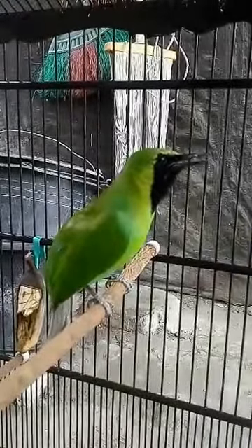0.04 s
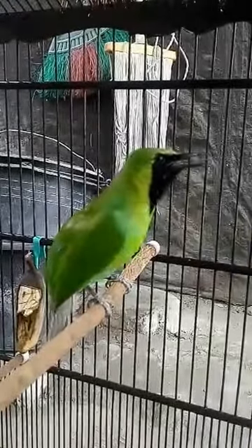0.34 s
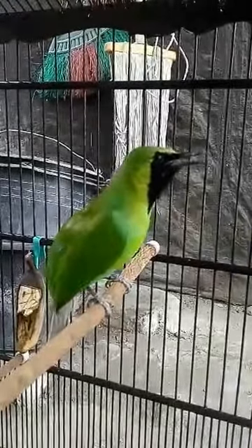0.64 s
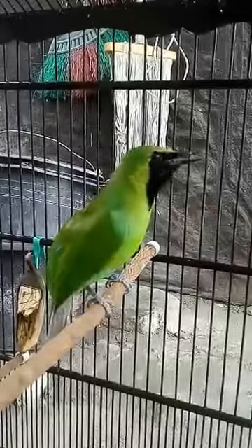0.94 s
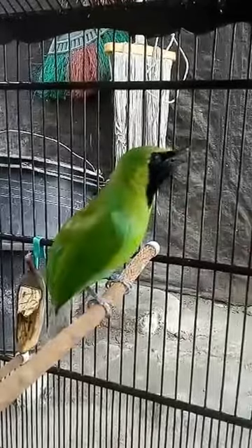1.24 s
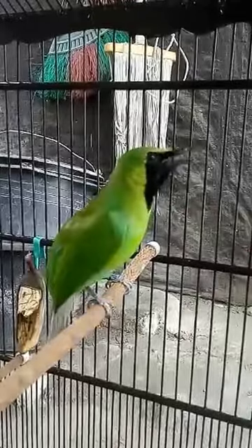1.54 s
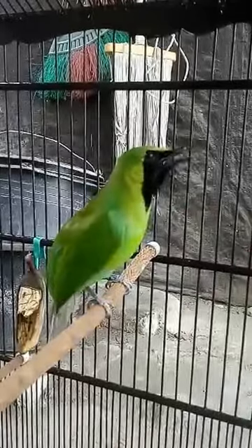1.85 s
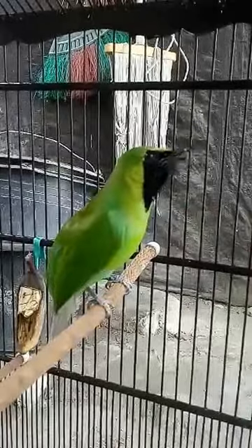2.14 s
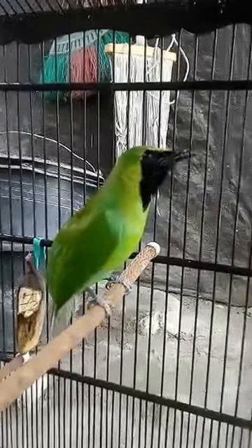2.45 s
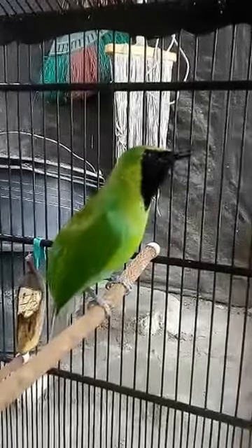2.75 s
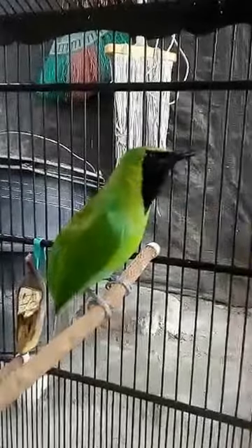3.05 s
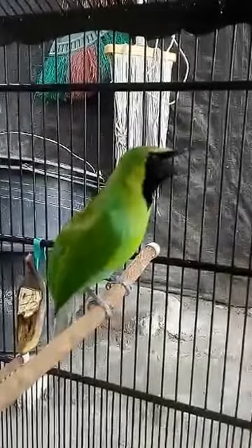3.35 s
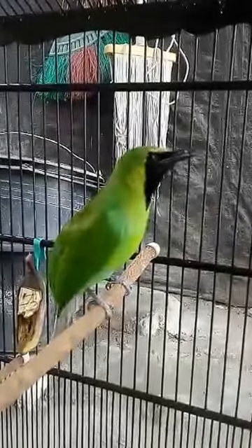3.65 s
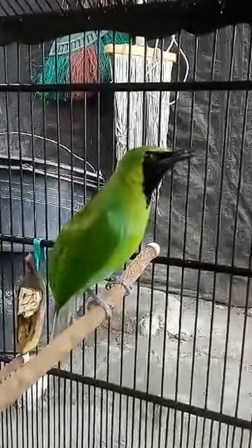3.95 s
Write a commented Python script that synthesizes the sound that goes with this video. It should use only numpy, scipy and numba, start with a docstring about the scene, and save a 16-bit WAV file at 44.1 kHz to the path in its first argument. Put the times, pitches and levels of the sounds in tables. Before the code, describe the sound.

Close to the microphone, a bird in a cage alternates short trills and dipping notes, repeats rough rising chirps, then ends with sharp sweeps. Two faint taps touch the cage, and soft traffic rumble carries into the small space.

```python
"""A caged leafbird sings close up in a small hard-walled space: falling whistles, buzzy trills, dipping
calls, a run of raspy rising chirps and two sweeps sung with both sides of its syrinx. Each voice is a
vibrating membrane, its overtones and breath shaped by the beak. Two light taps touch the cage.
Behind it, a distant engine rumbles in a bed of street noise and soft hiss.
A limiter ducks the whole mix at each loud note."""
import sys
import numpy as np
from scipy import signal
from scipy.fft import rfft, irfft, next_fast_len
from scipy.io import wavfile
from scipy.ndimage import uniform_filter1d, minimum_filter1d
from numba import njit

SR = 44100
rng = np.random.default_rng(int(sys.argv[2]) if len(sys.argv) > 2 else 0)


def unload_audio(sound):
    """Save the sound as a 16-bit wav file, at the path given as the first command line argument."""
    columns = np.transpose(np.atleast_2d(sound))
    # keep every value between -1 and 1, then stretch to whole-number steps
    steps = np.round(np.clip(columns, -1, 1) * 32767)
    wavfile.write(sys.argv[1], SR, steps.astype(np.int16))


N = 176400
T = np.arange(N) / SR

# Gliding whistles, one curve a note. Each point: time in seconds, pitch in Hz, level in dB.
WHISTLES = [
    [(-.005, 3326, -17), (.023, 3360, 1), (.038, 3127, -5), (.046, 2920, -11.5), (.053, 2410, 2),
     (.062, 1970, -13.5), (.072, 1690, -30)],
    [(2.594, 3300, -51), (2.614, 4264, -33), (2.634, 5450, -16), (2.644, 4674, -18), (2.652, 3685, 1.5),
     (2.668, 3560, 6), (2.682, 3380, -2), (2.701, 3500, 5), (2.715, 3276, 4), (2.723, 2804, -4),
     (2.73, 2400, 0), (2.739, 2000, -16), (2.751, 1670, -24)],
    [(3.451, 3020, -21), (3.457, 3770, -8), (3.466, 4620, -15), (3.481, 4980, -4), (3.497, 5770, -8.5),
     (3.507, 5060, -8), (3.516, 4120, 3.5), (3.528, 3816, 1), (3.545, 4085, -0.5), (3.556, 4177, -6)],
    [(3.536, 3300, -15), (3.546, 3750, -13), (3.562, 3636, -5.5), (3.573, 3514, 6.5), (3.584, 3200, 3),
     (3.592, 2990, -4), (3.604, 2776, -7.5), (3.61, 2380, 3), (3.617, 1990, -17.5), (3.627, 1620, -29.5)],
]
# The hoarse lower voice under each upward sweep. Each point: time in seconds, pitch in Hz, level in dB.
UNDERTONES = [
    [(2.588, 1798, -32.5), (2.603, 2113, -26.5), (2.618, 2390, -0.5), (2.629, 2940, -15), (2.648, 3055, -7)],
    [(3.451, 2205, -32), (3.457, 2290, -12), (3.478, 2527, -5), (3.487, 2820, -18.5), (3.508, 2927, -7.5)],
]
# Dipping calls, one curve a note. Each point: time in seconds, pitch in Hz, tone and overtones in dB.
DIPS = [
    [(.437, 3274, -36, -55), (.443, 2755, -22, -47), (.448, 2450, 0, -26), (.458, 2103, -9, -28.5),
     (.48, 1900, -18, -29), (.498, 2012, -13, -31), (.507, 2543, -1.5, -17.5), (.516, 2790, -7, -31)],
    [(.884, 3240, -31, -55), (.891, 2816, -30.5, -47), (.898, 2390, 0, -32), (.909, 2147, -12, -27),
     (.928, 1938, -17, -26.5), (.947, 1955, -11, -22.5), (.954, 2430, -5.5, -19.5),
     (.965, 3170, -10.5, -33)],
    [(3.155, 2600, -22, -48), (3.158, 2270, -20, -45), (3.163, 1804, -14.5, -30), (3.173, 1683, -8.5, -38),
     (3.183, 1810, -13, -34), (3.193, 1910, -63, -50), (3.207, 2200, -17, -47), (3.216, 2600, -4, -48),
     (3.222, 2270, -1.5, -34), (3.229, 2420, -6, -26)],
    [(3.304, 2627, -18, -47), (3.307, 2425, -7.5, -34), (3.313, 1952, -8.5, -28), (3.33, 1753, -10, -27),
     (3.339, 1846, -41, -52), (3.346, 2033, -26, -31), (3.353, 2423, 2, -29), (3.362, 2574, -1, -23),
     (3.371, 2520, 6, -19)],
]
# Buzzy trills. Each row: start and length in seconds, a time in seconds that the vibrato crests line
# up with, vibrato rate in Hz, centre pitch in Hz, crest level in dB.
TRILLS = [(0.159, 0.13, 0.16, 76.5, 2091, -5), (0.619, 0.13, 0.53, 74, 2167, -3)]
# Rising chirps. Each row: time of the upward snap in seconds, low, top and end pitch in Hz, hold in
# seconds, base tone and overtone levels in dB, rasp from 0 to 1, lead-in trim in dB, lead-in rasp.
CHIRPS = [ (1.155, 2053, 2694, 2760, .029, -7.5, -19, 1, 5, 0.32),
          (1.296, 2225, 2583, 2902, .028, -7, -17, 0.98, -1, 0.4),
          (1.456, 2180, 2824, 2870, 0.0266, -9, -18, 0.88, -3.5, 0.2),
          (1.606, 2362, 2860, 3357, .026, -8.5, -19.5, 0.8, 8, 0.3),
          (1.749, 2164, 2565, 2845, .025, -6.5, -20.5, 1, -0.5, 0.23),
          (1.901, 2194, 2640, 2757, 0.0232, -9, -18.5, 0.73, 0, 0.23),
          (2.037, 2238, 2606, 2730, 0.019, -7, -17.5, 0.92, 1.5, 0.21),
          (2.198, 2123, 2493, 2860, .024, -4.5, -20.5, 0.53, 0, 0.17),
          (2.372, 2040, 2589, 2630, 0.054, -6, -29, 0.11, 1, 0.2)]
# Throat and beak resonances that colour the overtones. Each row: frequency in Hz, gain in dB.
BEAK_EQ = [(3000, 7.5), (4200, 3), (5200, -4), (6100, 1), (7100, -3), (8200, -0.5), (8900, -1.5),
           (9500, -10.5), (11000, 0), (13000, -7.5), (15500, -5)]
# Hiss of air in the beak. Each row: frequency in Hz, gain in dB.
AIR_EQ = [(1200, -49), (2500, 7), (5000, 5.5), (8500, -8.5), (9500, -22.5), (11200, -3.5), (15000, -5)]
# Light taps on the cage. Each row: start in seconds, tick level in dB, ring level in dB.
CAGE_TAPS = [(2.526, -31, -54), (3.667, -42, -30.5)]
# Early reflections off the near walls. Each row: delay in seconds, level in dB.
REFLECTIONS = [(.0047, -11), (0.0113, -15.5), (0.017, -19.5)]
# Tone of the reverb tail. Each row: frequency in Hz, gain in dB.
TAIL_EQ = [(1000, -11), (2000, -4.5), (2800, 1.5), (3600, -4.5), (6000, 4.5), (15000, 3)]
# Width where the two microphone ports disagree, near 2 kHz. Each row: frequency in Hz, side gain in dB.
MIC_SIDE_EQ = [(900, -19), (1700, -6), (1950, 6.5), (2150, 0.5), (2350, -23.5), (2550, -39.5), (3400, -32),
               (4100, -12), (5500, -42), (15000, -25)]
# The distant engine's pace. Each row: time in seconds, firings per second, level in dB.
ENGINE_RUN = [(0, 64.4, -31), (0.801, 57.1, -21.5), (1.198, 57.3, -18.5), (1.698, 56, -21),
              (2.299, 54.4, -24), (2.548, 55.8, -19.5), (2.898, 58, -21), (3.15, 57.8, -21.5),
              (3.448, 56, -23), (4, 43.6, -22.5)]
# The dull exhaust. Each row: frequency in Hz, gain in dB.
EXHAUST_EQ = [(30, -39), (60, -9), (90, -11.5), (122, 1.5), (145, -0.5), (172, 1), (260, -12.5),
              (460, -17.5), (800, -25.5), (2000, -57), (8000, -120)]
# Rumble and hiss of the street. Each row: frequency in Hz, gain in dB.
STREET_EQ = [(20, -14.5), (42, -7.5), (62, 0.5), (85, -2), (215, 1), (260, -5), (460, -6), (700, -13.5),
             (1300, -15.5), (2300, -23.5), (4000, -25), (6400, -27.5), (8500, -46), (12000, -58),
             (15500, -62)]
# Fader ride on the street. Each row: time in seconds, level in dB.
STREET_SWELL = [(0, -26), (1.2, -27), (2.4, -27.5), (2.8, -25), (3.15, -20), (3.45, -17.5), (3.75, -25.5),
                (4, -24)]
# Stereo width of the street. Each row: frequency in Hz, side over mid in dB.
STREET_SIDE_EQ = [(30, -22), (150, -50), (350, -14), (700, -5), (1400, 1.5), (2500, -3), (15000, 3)]

# Balance of harmonics 2 to 6, ahead of the beak's resonances.
WHISTLE_HARMONICS_DB = (-4, -7, -27, -36, -41)
REEDY_HARMONICS_DB = (-4, -9, -18.5, -25.5, -27)
CALL_HARMONICS_DB = (-8, -5.5, -21.5, -16.5, -19)


def syrinx(t, hz, db, overtone_db, harmonics_db, rasp, air_db=4.5, rasp_hz=520):
    """A vibrating membrane: a tone, plus overtones and air through the beak. Rasp shakes pitch and gain."""
    shaken_hz = hz * (1 + 0.062 * rasp * wander(t, 2 * rasp_hz))
    phase = 2 * np.pi * np.cumsum(shaken_hz) / SR
    harmonics = sum(undb(d) * np.sin(k * phase) * (k * hz < SR / 2) for k, d in enumerate(harmonics_db, 2))
    breath = undb(air_db + 9.5 * (rasp - 2)) * noise(AIR_EQ, size=len(t))  # rougher is breathier
    overtones = colour(harmonics + breath, BEAK_EQ)
    flutter = 1 + rasp * wander(t, rasp_hz)
    return np.sqrt(2) * flutter * (undb(db) * np.sin(phase) + undb(overtone_db) * overtones)


def glides(curves, overtone_db, harmonics_db, **voice):
    """Slurred notes from one side of the syrinx, the overtones riding with the level."""
    out = np.zeros(N)
    for curve in curves:
        times, hz, db = np.array(curve).T
        t = span(times[0], times[-1])
        level = np.interp(t, times, db)
        note = syrinx(t, np.interp(t, times, hz), level, level + overtone_db, harmonics_db, **voice)
        add(out, t, gate(t, times[0], times[-1]) * note)
    return out


def dips(rasp=0.19, snap_rasp=0.58, snap_s=0.0053):
    """Calls that drop to a soft low note and snap back up, with grit at the very end."""
    out = np.zeros(N)
    for curve in DIPS:
        times, *controls = np.array(curve).T
        t = span(times[0], times[-1])
        hz, db, overtone_db = (np.interp(t, times, c) for c in controls)
        grit = rasp + snap_rasp * np.exp(-np.abs(t - times[-1]) / snap_s)
        note = syrinx(t, hz, db, overtone_db, CALL_HARMONICS_DB, grit)
        add(out, t, gate(t, times[0], times[-1]) * note)
    return out


def trills(depth=0.093, sag=0.158, accent_db=5, fade_db=-20, attack_s=0.032, release_s=0.0243):
    """A buzz of fast vibrato, loudest on each crest; the pitch sags as the note ends."""
    out = np.zeros(N)
    for start, length, crest, rate, pitch, db in TRILLS:
        end = start + length
        t = span(start, end)
        rise = np.clip((t - start) / attack_s, 0, 1)
        fall = np.clip((end - t) / release_s, 0, 1)
        vibrato = np.cos(2 * np.pi * rate * (t - crest)) * rise * fall
        hz = pitch * (1 + depth * vibrato - sag * (1 - fall))
        level = db + accent_db * (vibrato - 1) + fade_db * (1 - rise + (1 - fall) / 2)
        note = syrinx(t, hz, level, level - 18.5, CALL_HARMONICS_DB, rasp=0.47)
        add(out, t, gate(t, start, end) * note)
    return out


def chirps(lead_s=0.028, snap_s=0.00578, release_s=0.0082):
    """A soft reedy lead-in snaps up to a rough top note, accented at both ends."""
    # Envelope points: three of lead-in, mid-snap, opening accent, waist, closing accent, release.
    tone_shape_db = np.array([-32.5, -19.5, -11, 4.5, 4.5, -14, 7, -24])
    overtone_shape_db = [-13, -7.5, -4, 0, 9, -3, -1.5, -24]
    out = np.zeros(N)
    for at, low, top, last, hold, db, overtone_db, rasp, lead_db, lead_rasp in CHIRPS:
        lead_times = [-lead_s, -lead_s * 2 / 3, 0]
        times = at + np.array([*lead_times, snap_s / 2, snap_s, hold * 0.57, hold * 0.9, hold + release_s])
        pitches = [low * 0.85, low * 0.94, low, (low + 2 * top) / 3, top, top, last, last]
        t = span(times[0], times[-1])
        level = db + np.interp(t, times, [*(tone_shape_db[:3] + lead_db), *tone_shape_db[3:]])
        overtone_level = overtone_db + np.interp(t, times, overtone_shape_db)
        grit = np.interp(t, times[4:6], [lead_rasp, rasp])
        note = syrinx(t, np.interp(t, times, pitches), level, overtone_level, REEDY_HARMONICS_DB, grit)
        add(out, t, gate(t, times[0], times[-1]) * note)
    return out


def cage_taps(tick_s=0.0015, wire_hz=1260, wire_t60_s=0.56):
    """Each tap is a bright tick and the faint ring of a cage wire."""
    out = np.zeros(N)
    for at, tick_db, ring_db in CAGE_TAPS:
        t = T[T >= at]
        age = t - at
        tick = undb(tick_db) * np.exp(-age / tick_s) * noise(AIR_EQ, size=len(t))
        ring = undb(ring_db) * decay(age, wire_t60_s) * np.sin(2 * np.pi * wire_hz * age)
        add(out, t, tick + ring)
    return out


def room(dry, wet_db=-14.5, split_hz=4500, low_t60_s=0.24, treble_t60_s=0.15, onset_s=0.0088):
    """Hard walls add early reflections and a short diffuse tail that loses its treble first."""
    near = dry + sum(undb(db) * np.interp(T - lag, T, dry, left=0) for lag, db in REFLECTIONS)
    t = T[:SR // 2]
    fade_in = np.clip(t / onset_s, 0, 1) ** 2
    tails = []
    for _ in range(2):  # mid, then side
        white = rng.standard_normal(len(t))
        low = signal.sosfiltfilt(signal.butter(2, split_hz, fs=SR, output="sos"), white)
        tail = low * decay(t, low_t60_s) + (white - low) * decay(t, treble_t60_s)
        impulse = colour(unit(tail * fade_in), TAIL_EQ) / np.sqrt(len(t))
        tails.append(signal.fftconvolve(dry, impulse)[:N])
    reverb = stereo(tails[0], undb(1.5) * tails[1])
    return stereo(near, colour(near, MIC_SIDE_EQ)) + undb(wet_db) * reverb


def engine(jitter=0.025, scatter_db=5, smear_s=0.019, hum_db=-5, side_db=-17):
    """Uneven firings through a dull exhaust, smeared by houses on the way, over a low hum."""
    times, rate, db = np.array(ENGINE_RUN).T
    cycles = np.cumsum(np.interp(T, times, rate) * (1 + jitter * wander(T, 30))) / SR
    firings = np.diff(np.floor(cycles), prepend=0) * undb(scatter_db * wander(T, 100))
    t = T[:SR // 4]
    smear = 0.029 * rng.standard_normal(len(t)) * np.exp(-t / smear_s)
    exhaust = unit(colour(firings + signal.fftconvolve(firings, smear)[:N], EXHAUST_EQ))
    hum = sum(np.sin(2 * np.pi * order * cycles) * (1 + 0.38 * wander(T, 9)) for order in (2, 3))
    drone = unit(exhaust + undb(hum_db) * hum)
    return stereo(drone, undb(side_db) * noise(EXHAUST_EQ)) * undb(np.interp(T, times, db))


def street():
    """A bed of traffic rumble and hiss that swells once."""
    times, db = np.array(STREET_SWELL).T
    bed = stereo(noise(STREET_EQ), colour(noise(STREET_EQ), STREET_SIDE_EQ))
    return bed * undb(np.interp(T, times, db))


def hiss(centre_s=3.26, width_s=0.35, db=-41):
    """A soft, bright hiss that fades up and away late in the song."""
    band = [(2000, -26), (4000, 1), (5200, 3.5), (6500, -16), (9000, -19), (15000, -32)]  # Hz, dB
    swell = np.exp(-((T - centre_s) / width_s) ** 2)
    return stereo(noise(band), undb(-8) * noise(band)) * undb(db) * swell


def undb(db):
    """Decibels to gain."""
    return 10 ** (np.asarray(db) / 20)


def unit(x):
    """Scale to rms 1."""
    return x / np.sqrt(np.mean(x ** 2))


def decay(t, t60_s):
    """An envelope that falls 60 dB in t60_s."""
    return np.exp(-np.log(1000) * t / t60_s)


def colour(x, eq):
    """Apply an EQ curve of (Hz, dB) points."""
    hz, db = np.array(eq, float).T
    size = next_fast_len(len(x) + 2048)
    f = np.maximum(np.fft.rfftfreq(size, 1 / SR), 1)
    gain = undb(np.interp(np.log(f), np.log(hz), db))
    return irfft(rfft(x, size) * gain, size)[:len(x)]


def noise(eq, size=N):
    """Coloured noise of rms 1."""
    return unit(colour(rng.standard_normal(size), eq))


def wander(t, rate_hz):
    """A modulator: random values joined by straight lines."""
    knots = rng.standard_normal(4096)
    return np.interp((t - t[0]) * rate_hz, np.arange(len(knots)), knots)


def span(start, end):
    """Sample times of one note, with handles for its fades."""
    return T[(T > start - .01) & (T < end + .01)]


def gate(t, start, end, fade_s=0.0034):
    """A soft gate that opens just before start and closes just after end."""
    return np.sin(np.pi / 2 * np.clip(np.minimum(t - start, end - t) / fade_s + 1, 0, 1)) ** 2


def add(out, t, sound):
    """Mix a sound in at its sample times."""
    out[np.rint(t * SR).astype(int)] += sound


def stereo(mid, side):
    """Left and right from mid and side."""
    return np.array([mid - side, mid + side])


@njit
def follow(x, fall):
    """Peak follower: instant attack, exponential release."""
    out, held = np.empty(len(x)), 0.
    for i in range(len(x)):
        held = max(x[i], held * fall)
        out[i] = held
    return out


def scene(pan_db=1.05):
    """Bird and cage up front in the room; the background leans slightly left."""
    bird = glides(WHISTLES, -21.5, WHISTLE_HARMONICS_DB, rasp=0.061, air_db=12)
    bird += glides(UNDERTONES, -7, REEDY_HARMONICS_DB, rasp=0.36)
    bird += dips() + trills() + chirps()
    foreground = room(bird + cage_taps())
    background = engine() + street() + hiss()
    return foreground + background * undb([[pan_db], [-pan_db]])


def record(dry, threshold_db=-4, ratio=4.28, release_s=0.056, top_hz=15600):
    """A limiter ducks the mix at loud notes; any overs clip, and a steep low-pass trims the top."""
    peak = follow(np.abs(dry).max(axis=0), np.exp(-1 / (release_s * SR)))
    gain = np.minimum(1, undb(threshold_db) / peak) ** (1 - 1 / ratio)
    gain = uniform_filter1d(minimum_filter1d(gain, size=88), size=88)  # hold and smooth over 2 ms
    lowpass = signal.ellip(8, .2, 70, top_hz, fs=SR, output="sos")
    return signal.sosfilt(lowpass, np.clip(dry * gain, -1, 1))


dry = scene()
out = record(dry)
unload_audio(out)
```